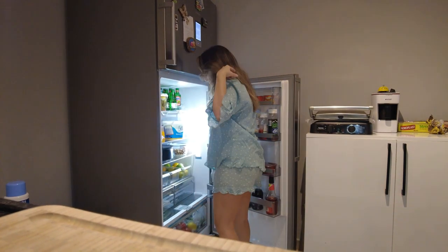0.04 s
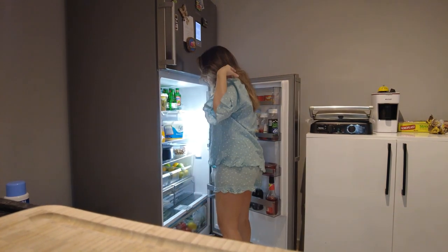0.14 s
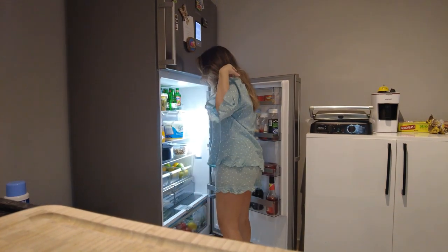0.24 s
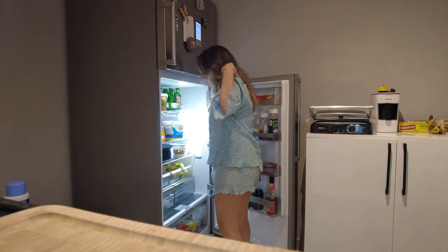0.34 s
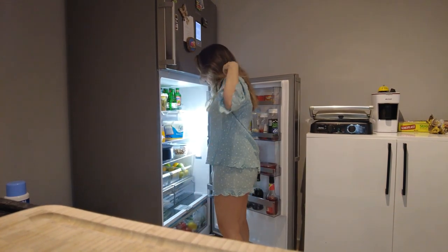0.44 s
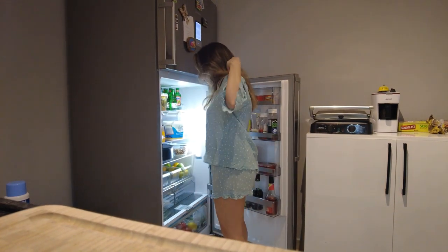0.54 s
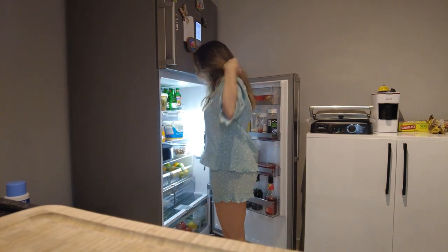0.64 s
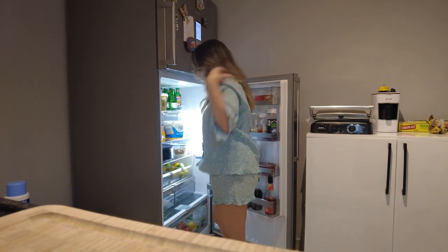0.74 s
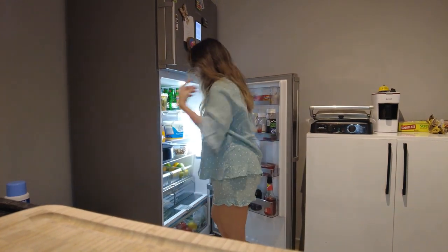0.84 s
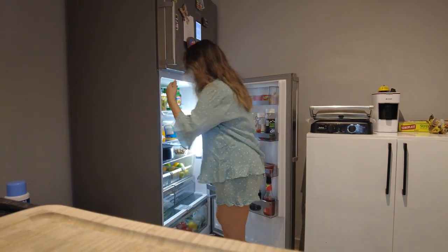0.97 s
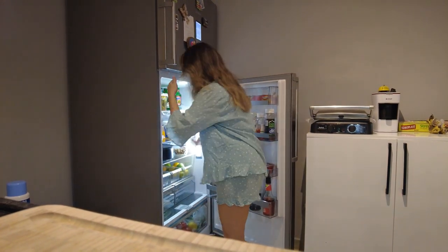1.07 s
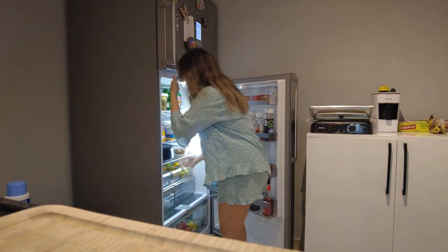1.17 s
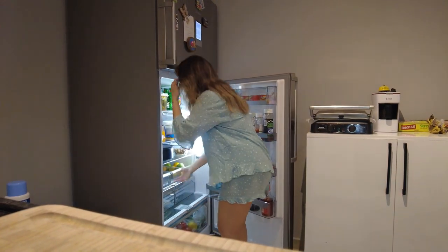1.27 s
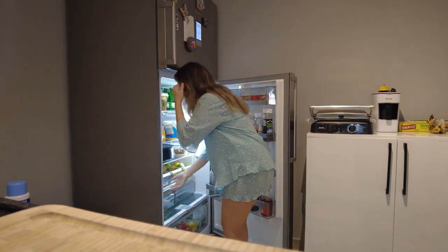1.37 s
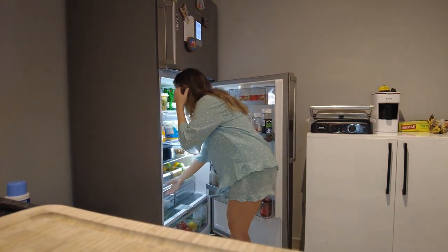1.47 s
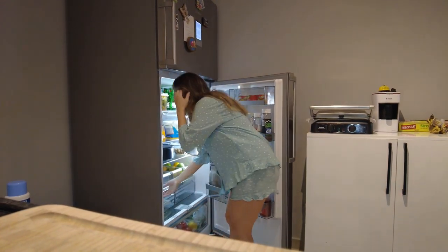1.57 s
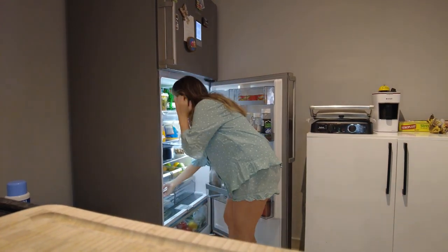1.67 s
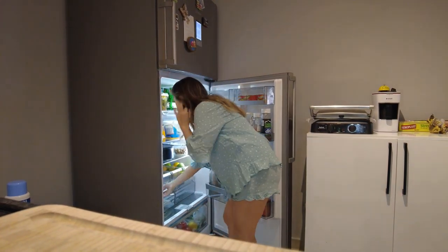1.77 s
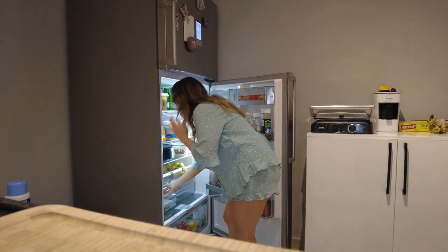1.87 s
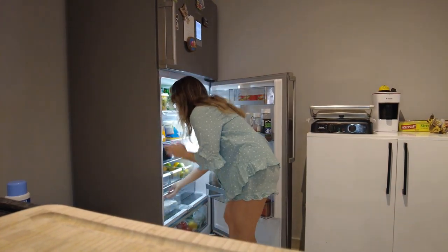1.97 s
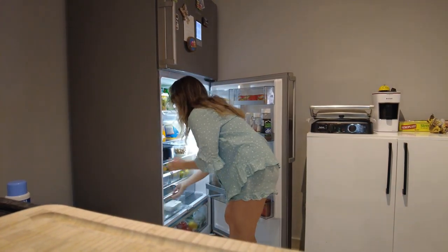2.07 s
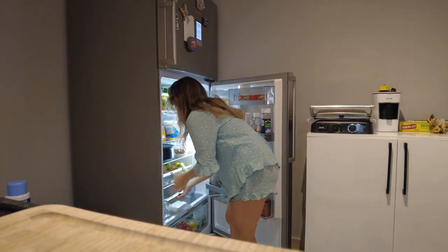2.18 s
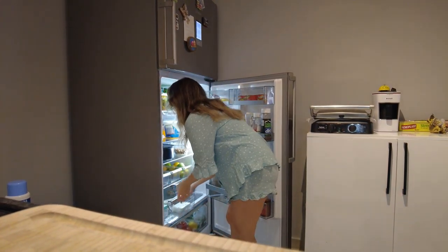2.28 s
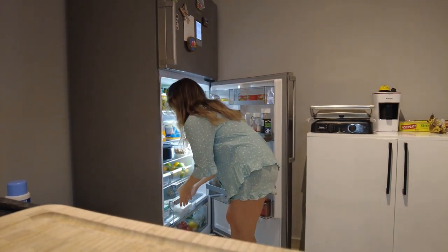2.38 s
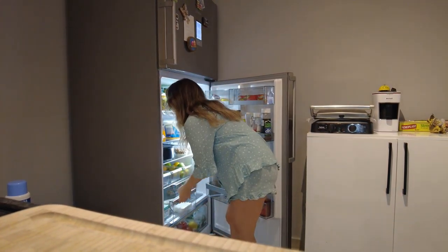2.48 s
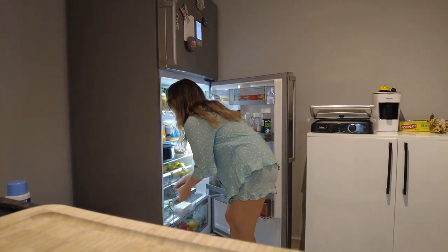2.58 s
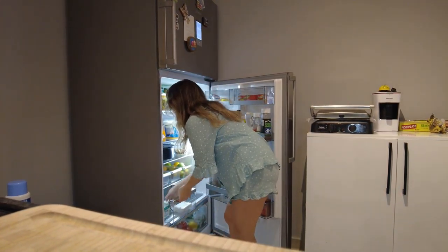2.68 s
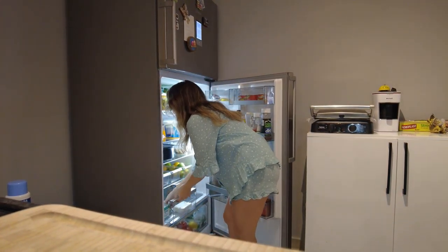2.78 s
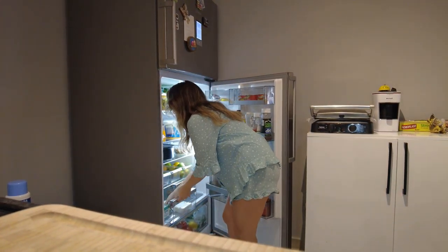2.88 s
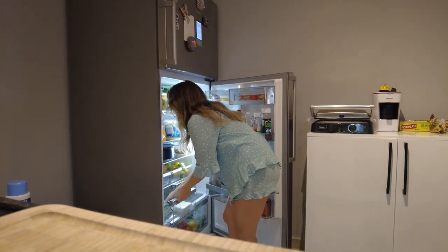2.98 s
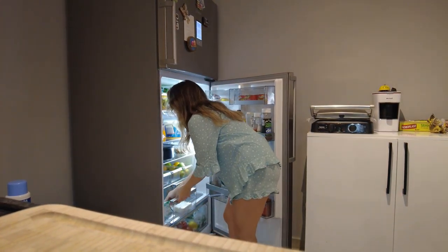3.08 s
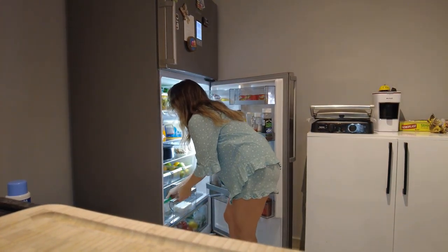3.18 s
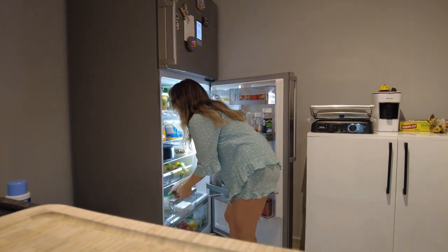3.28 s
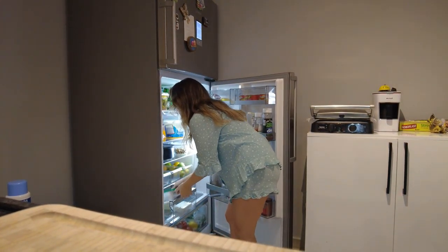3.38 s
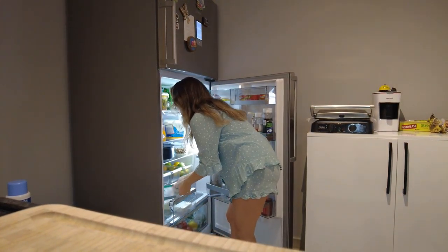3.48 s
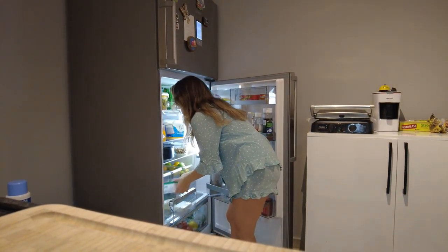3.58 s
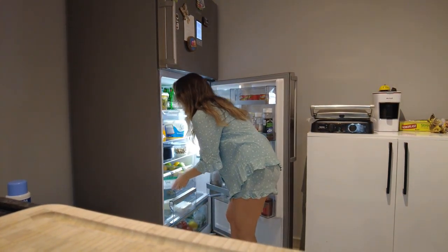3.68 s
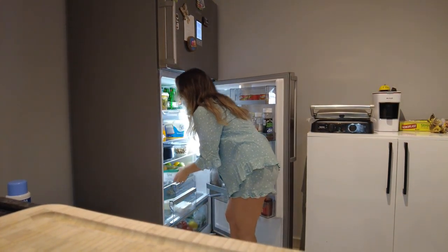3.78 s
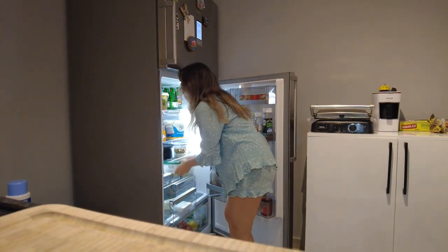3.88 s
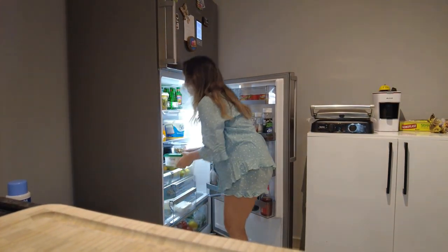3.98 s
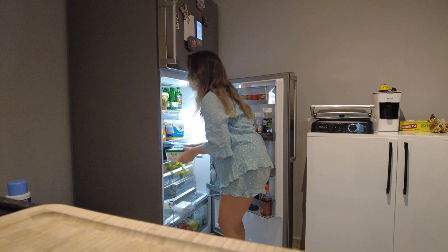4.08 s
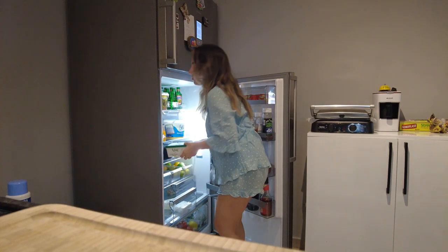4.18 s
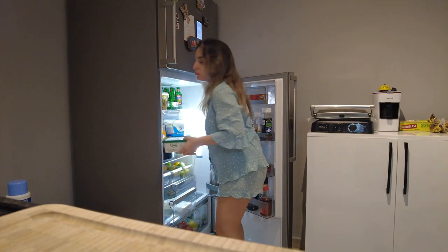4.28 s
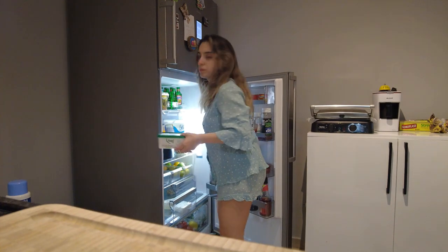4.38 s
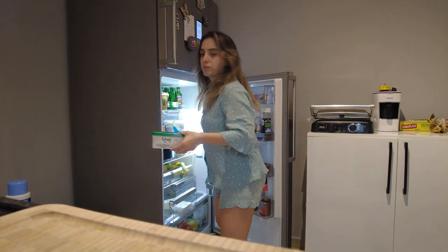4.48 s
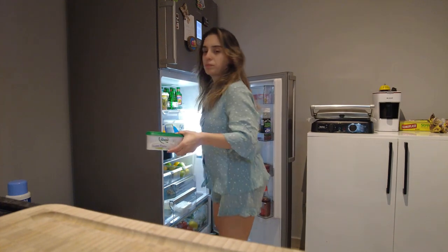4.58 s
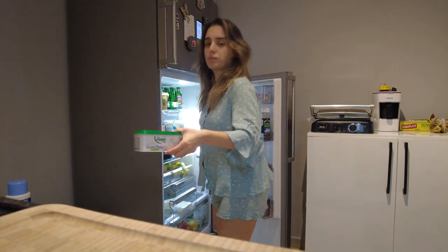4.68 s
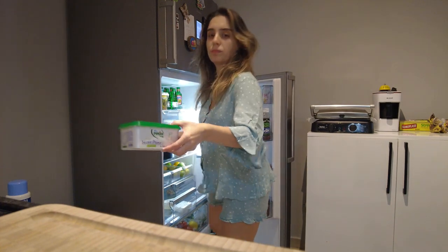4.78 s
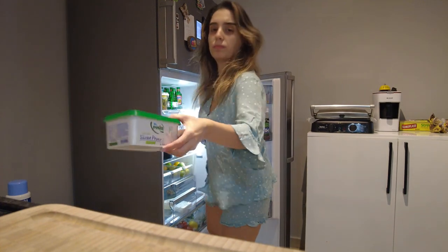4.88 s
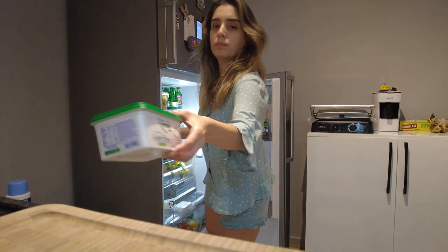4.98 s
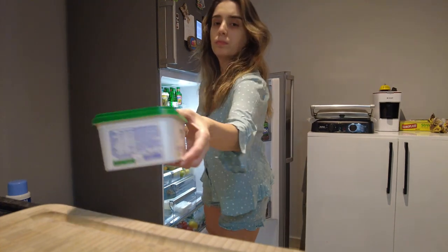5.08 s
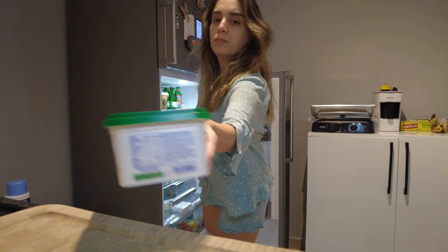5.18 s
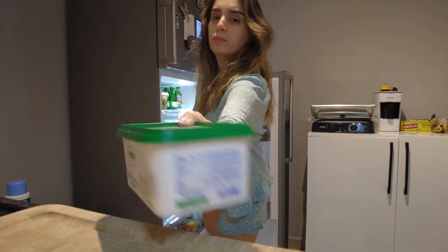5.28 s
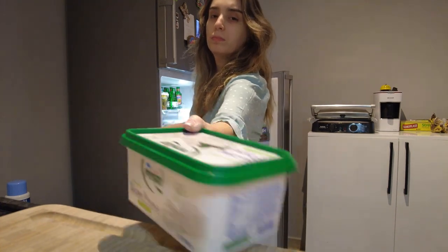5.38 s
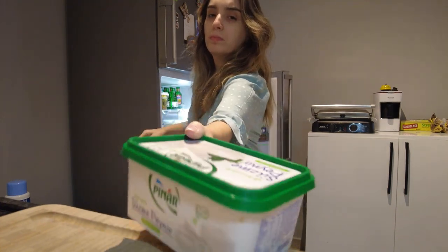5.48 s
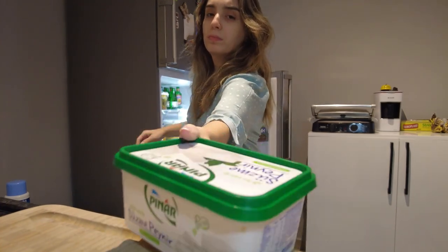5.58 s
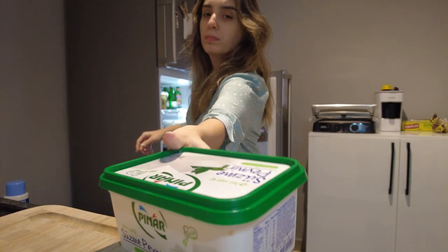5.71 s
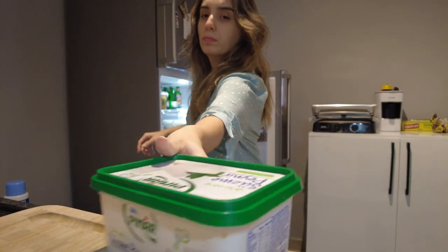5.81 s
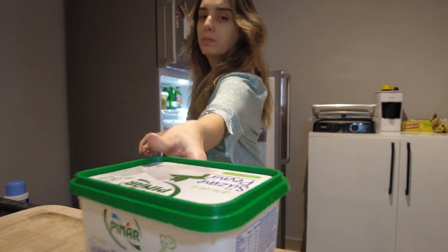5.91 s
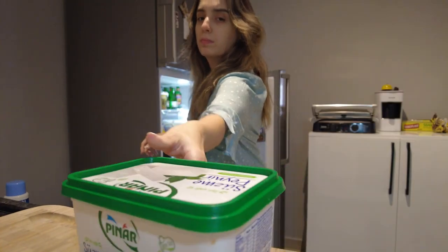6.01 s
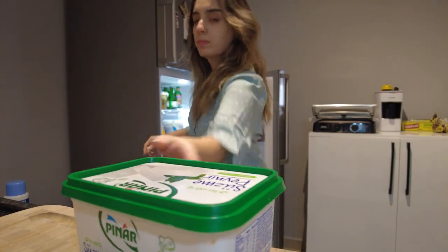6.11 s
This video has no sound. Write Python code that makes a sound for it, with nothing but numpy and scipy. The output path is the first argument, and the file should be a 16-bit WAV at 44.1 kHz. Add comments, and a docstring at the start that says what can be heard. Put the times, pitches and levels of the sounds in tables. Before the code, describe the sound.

Soft fridge rummaging with clunks, drawer rumble, wrapper crackle and slipper scuffs, ending in a hard plastic tub knock and juddering push on wood.

```python
"""A fridge hums across a small hard-walled kitchen while someone shuffles at its open door and shifts jars.
A drawer is pulled, wrappers crackle, the drawer runs home and a plastic tub is dragged off its shelf.
After slipper steps the tub lands on a wooden board right at the microphone: one edge, flat, a juddering push.
Blows ring decaying modes, slides filter random slips, cloth is coloured noise; distance is the share of room echo.
The loudest blow overloads the microphone."""
import sys
import numpy as np
from scipy import signal
from scipy.fft import rfft, irfft, next_fast_len
from scipy.io import wavfile

SR = 44100
rng = np.random.default_rng(int(sys.argv[2]) if len(sys.argv) > 2 else 0)


def transcribe(u):
    """Save the signal u as a 16-bit wav file named by the first command-line argument.

    u: samples, shape (n,) or (channels, n), limited to [-1, 1]; the rate is SR.
    q: integer samples, one column per channel.
    """
    v = np.clip(np.atleast_2d(u).T, -1, 1)
    q = np.round(v * 32767).astype(np.int16)
    wavfile.write(sys.argv[1], SR, q)


N = 271157
TIME = np.arange(N) / SR

# Event levels are at the source, before the distance mix in scene(). In the slides,
# start_s is when full speed is reached, after rise_s; hold_s and fall_s follow.

# kitchen air at the microphone, spectrum: pitch_hz, level_db
AIR_COLOUR = [(20, 9.5), (30, 5.5), (45, 8), (65, -5.5), (80, -14.5), (110, -8.5), (200, -16.5), (350, -26),
              (550, -28), (1100, -36.5), (3000, -42.5), (8000, -47.5), (15500, -54)]
AIR_DB = -41.5
# fridge motor tones: pitch_hz, level_db
HUM = [(27, -50), (78.5, -47.5)]
# puffs of air on the microphone: start_s, rise_s, hold_s, fall_s, level_db
PUFFS = [(0, .05, 0.049, 0.14, -22), (5.804, 0.204, 0.51, 0.14, -38.5)]
# kitchen echo: pitch_hz, t60_s
ROOM = [(100, 0.85), (400, 0.49), (1500, 0.42), (5000, 0.2), (15000, 0.034)]

# things shift on a shelf with a hollow rub: start_s, rise_s, hold_s, fall_s, rumble_db, scrape_db
SHIFTS = [(0, .02, 0.013, 0.049, -40, -54.5), (.2, 0.058, 0.18, 0.05, -49, -58),
          (2.9, 0.15, 0.11, .05, -49, -53), (3.22, 0.026, 0.031, 0.031, -50, -65)]
# hollow resonances of that rub: pitch_hz, width_hz, level_db
HOLLOW = [(234, 103, -6), (505, 80, 0.5), (760, 400, -16.5)]
# spectrum of plastic scraping: pitch_hz, level_db
GRIT_COLOUR = [(400, 7.5), (800, -2.5), (1150, -2.5), (1550, -2), (1900, -13.5), (2700, -5), (3600, -18),
               (6000, -15), (15000, -37.5)]
SCRAPE_POWER = 0.52  # the scrape grows as this power of the sliding speed

# the body moves and the clothes rustle: start_s, hold_s, level_db
MOVES = [(0, 0.25, -55.5), (.89, 0.013, -56.5), (1.08, 0.051, -58), (1.767, 0.65, -49), (2.882, .34, -52),
         (3.88, 0.075, -46.5), (4.07, .1, -56.5), (4.62, 0.47, -56.5), (5.324, 0.11, -56.5)]
MOVE_RISE_S, MOVE_FALL_S, CLOTH_REST_DB = 0.042, 0.067, -58.5
# spectrum of cloth: pitch_hz, level_db
FABRIC_COLOUR = [(300, 4.5), (800, 2), (1600, 1), (3000, 0), (6000, -4), (10000, -10.5), (15500, -16.5)]
# slipper soles slide on the floor: start_s, rise_s, hold_s, fall_s, level_db
SCUFFS = [(0.114, 0.033, 0.05, 0.07, -43), (1.412, 0.02, 0.095, 0.036, -38.5),
          (4.931, 0.07, 0.0089, 0.031, -37)]
# spectrum of a sole: pitch_hz, level_db
SOLE_COLOUR = [(200, -28), (550, -6), (1100, -8), (1500, -4), (2200, -6.5), (3000, -2.5), (4800, -2),
               (7500, -6.5), (11000, -13.5), (15500, -20)]

# jars and tubs bump the shelves: start_s, level_db, contact_hz (softness corner),
# lowest_hz (the spot rings weakly below), tick_db
KNOCKS = [(0.356, -34.5, 790, 590, -72), (1.051, -42.5, 1600, 444, -44), (1.555, -38, 880, 605, -44.5),
          (1.644, -33.5, 435, 228, -65), (1.764, -30.5, 690, 223, -40), (1.835, -43, 1474, 296, -41),
          (2.169, -31.5, 1590, 900, -57), (2.345, -41, 2500, 300, -33.5), (2.845, -29.5, 2200, 116, -35),
          (2.974, -29.5, 1320, 102.5, -39), (3.184, -45.5, 2980, 790, -37), (3.860, -40.5, 2220, 400, -32),
          (4.585, -39.5, 1560, 282, -36.5)]
# fridge shelf modes: pitch_hz, level_db, t60_s
SHELF_MODES = [(110, 5.5, 0.12), (167.4, 1.5, 0.033), (257.5, -3.5, 0.093), (377, -2.5, 0.19),
               (530, -3.5, 0.034), (629, 2, 0.046), (870, -4, 0.055), (908, -2, 0.042), (1252, -7, 0.13),
               (1305, -9, 0.058), (1444, 5, 0.015), (1995, 3, 0.013), (2350, -0.5, 0.032), (2900, -9, .03)]
# spectrum of a contact tick: pitch_hz, level_db
TICK_COLOUR = [(500, 20.5), (1500, -12), (2800, 7.5), (4000, -6.5), (6000, -12), (9000, -17.5),
               (15500, -59)]
TICK_DECAY_S = 0.012
# after the rim the base comes down: delay, level above the rim, share of the contact corner
SETTLE_S, SETTLE_DB, SETTLE_SOFTNESS = 0.012, 6.5, 0.47
# each spot on a shelf rings a little differently: random spread of level and (as a share) of pitch
SPOT_DB, SPOT_DETUNE = 1, 0.027

# the drawer is pulled: start_s, rise_s, hold_s, fall_s, rumble_db, scrape_db
DRAWER = [(2.28, 0.28, 0.013, .14, -31.5, -42.5)]
# drawer runner resonances: pitch_hz, width_hz, level_db
RUNNERS = [(101, 39, -1), (171, 50, -3), (247, 60, -3.5), (340.3, 28, 5), (384, 31, -2.5), (492, 80, -9),
           (588, 46, -11), (1160, 650, -27.5), (1570, 130, -22)]
# drawer contents nudge each other: level at full speed, its spread, contact corner, lowest pitch
JOSTLE_DB, JOSTLE_SPREAD_DB, JOSTLE_CONTACT_HZ, JOSTLE_LOWEST_HZ = -38, 2, 1500, 400
# the drawer jolts dully over its stops: start_s, level_db
JOLTS = [(1.956, -10.5), (2.132, -15.5), (2.415, -20), (2.49, -23)]
JOLT_CONTACT_HZ = 73
# crisp wrappers: start_s, level_db, decay_s
CRACKLES = [(2.978, -41, 0.03), (3.087, -47, 0.025), (3.214, -41, 0.033), (3.402, -64, 0.02),
            (3.859, -46.5, 0.075), (4.168, -49, 0.042)]
# spectrum of a wrapper: pitch_hz, level_db
WRAPPER_COLOUR = [(1000, 1.5), (3000, 6.5), (6000, 5.5), (10000, 1.5), (14000, -1.5)]
# the drawer runs home and rocks: start_s, level_db, contact_hz, lowest_hz, tick_db
SHUT = [(3.554, -26, 794, 220, -39), (3.565, -18, 475, 167, -38), (3.575, -34, 400, 100, -63),
        (3.605, -35.5, 1100, 600, -46)]
# modes of the drawer's plastic box: pitch_hz, level_db, t60_s
BOX_MODES = [(109, 4, 0.1), (161, -14, 0.24), (254.6, 1.5, 0.16), (360, 4, 0.079), (480, 10, 0.052),
             (647, 2, 0.086), (879, 6.5, 0.075), (1320, -11, 0.093), (1527, 4, 0.019), (2500, -21, 0.062)]
# the tub is dragged off its shelf: start_s, rise_s, hold_s, fall_s, rumble_db, scrape_db
DRAG = [(3.86, .08, 0.2, 0.071, -41.5, -53.5)]
# drone resonances of that shelf: pitch_hz, width_hz, level_db
DRONE = [(177.4, 38, -4.5), (358, 41, -15), (491, 97, -21), (636, 27, -13.5)]

# the tub meets the board: start_s, tub_db, board_db, contact_hz, click_db
LANDINGS = [(5.5665, -9, -30, 2100, -19), (5.6065, -11, -15, 560, -40), (5.7482, -8, 0, 1900, 3),
            (5.7722, -15, -13, 1900, -22), (5.870, -12, -19, 2300, -22)]
# modes of the full tub: pitch_hz, level_db, t60_s
TUB_MODES = [(174, -13, 0.073), (252, -9.5, 0.18), (363.6, 0, 0.069), (481, -14.5, 0.41), (627, -13, 0.12),
             (758, -10, 0.097), (957, -2.5, 0.035), (1280, 0, 0.018), (1734, -0.5, 0.017),
             (2260, -1.5, 0.005), (3200, -20, 0.016)]
# modes of the wooden board: pitch_hz, level_db, t60_s
BOARD_MODES = [(237, -48, 0.23), (389.4, -9, 0.14), (496, 2.5, 0.055), (575.3, 4.5, 0.082),
               (772, 5.5, 0.029), (872, 4.5, 0.033), (1048, -6, 0.049), (1298.4, -10, 0.13),
               (1410, 5.5, 0.019), (1556, 0.5, 0.024), (1790, -15, 0.053), (2168, -13, 0.088),
               (2280, 0.5, 0.015), (2660, -6, 0.036), (3440, -11, 0.024), (4600, -32, .015)]
# spectrum of the rim's click: pitch_hz, level_db
CLICK_COLOUR = [(700, -6), (1500, 0), (2800, -2), (3800, -5), (5200, -2), (7000, -5), (9000, -13),
                (12000, -23), (15500, -32)]
EAR_LAG_MS = 0.052  # right channel after left
# first echoes off the counter and the things on it: left_ms, right_ms, level_db
NEARBY = [(3.05, 2.15, -12), (5.65, 4.8, -15)]
# the tub's foot scrapes on the board: start_s, rise_s, hold_s, fall_s, level_db
PUSHES = [(5.578, 0.0037, 0.0055, 0.066, -36.5), (5.78, 0.049, 0.17, 0.07, -29)]
# spectrum of that scrape: pitch_hz, level_db
RUB_COLOUR = [(100, -8), (260, -9), (580, -10), (750, -13), (1100, -21.5), (1450, -14), (2000, -27.5),
              (2800, -24.5), (3800, -36.5), (6500, -41.5), (10000, -46.5), (15500, -55)]
# the foot judders until it catches: catch_s, level_db
JUDDERS = [(5.865, -15), (5.95, -27.5)]
JUDDER_HZ = 582  # centre of a wandering pitch
JUDDER_SWELL_S, JUDDER_STOP_S = 0.032, 0.014
TOP_HZ = 15600  # upper limit of the microphone channel


def undb(db):
    """Decibels to gain."""
    return 10 ** (np.asarray(db) / 20)


def unit(x):
    """Scale to rms 1."""
    return x / np.sqrt(np.mean(x ** 2))


def filtered(x, response):
    """Pass x through a frequency response given as a function of Hz."""
    size = next_fast_len(x.shape[-1] + 4096)
    hz = np.maximum(np.fft.rfftfreq(size, 1 / SR), 1)
    return irfft(rfft(x, size) * response(hz), size)[..., :x.shape[-1]]


def delayed(x, ms):
    """The same sound a little later, by a phase slope."""
    return filtered(x, lambda hz: np.exp(-2j * np.pi * hz * ms / 1000))


def colour(x, points):
    """Shape x by a spectrum, falling away below its first point; rms 1."""
    f, db = np.transpose(points)

    def response(hz):
        return undb(np.interp(np.log(hz), np.log(f), db)) * np.minimum(hz / f[0], 1) ** 2

    return unit(filtered(x, response))


def ear_noise(size, alike_hz=420, treble_likeness=0.085):
    """Diffuse noise at two ports: alike in the bass, nearly unrelated in the treble."""
    def likeness(hz):
        bass_part = (.97 - treble_likeness) / (1 + (hz / alike_hz) ** 2)
        return np.clip(treble_likeness + bass_part, 0, 1)

    mid, side = rng.standard_normal((2, size))
    mid = filtered(mid, lambda hz: np.sqrt(1 + likeness(hz)))
    side = filtered(side, lambda hz: np.sqrt(1 - likeness(hz)))
    return (mid + np.array([side, -side])) / np.sqrt(2)


def grains(rate, spread_db):
    """Tiny slips at random moments (rate per second), of uneven size."""
    size = undb(spread_db * np.minimum(rng.exponential(size=N), 4))
    happens = rng.random(N) < rate / SR
    return unit(happens * size * rng.standard_normal(N))


def waver(rate, depth_db):
    """A gain that wanders at random between knots, rate per second."""
    knots = rng.standard_normal(1024)
    return undb(depth_db * np.interp(TIME * rate, np.arange(len(knots)), knots))


def stroke(s, rise_s, hold_s, fall_s):
    """Speed of one movement, 0 to 1: it gathers, holds from time s, and dies away."""
    before = np.minimum(TIME - s, 0)
    after = np.maximum(TIME - s - hold_s, 0)
    return np.exp(-(before / rise_s) ** 2 - (after / fall_s) ** 2)


def strokes(movements):
    """Combined gain of several movements, each a timing and a level."""
    return sum(undb(db) * stroke(*timing) for *timing, db in movements)


def add(track, s, x):
    """Mix x in from time s."""
    start = max(int(s * SR), 0)
    x = x[..., :N - start]
    track[..., start:start + x.shape[-1]] += x


def struck(modes, contact_hz, lowest_hz=1):
    """Ring of a blow: soft contact misses the high modes, a stiff spot the low ones."""
    hz, db, t60 = np.transpose(modes)[:, :, None]
    t = TIME[:SR // 2]
    stiffness = 1 / np.sqrt(1 + (lowest_hz / hz) ** 4)
    softness = 1 / (1 + (hz / contact_hz) ** 2)
    gain = undb(db) * stiffness * softness
    sign = (-1) ** np.arange(len(hz))[:, None]
    decay = np.exp(-np.log(1000) * t / t60)
    ring = np.sum(sign * gain * np.sin(2 * np.pi * hz * t) * decay, axis=0)
    return ring * (1 - np.exp(-2 * np.pi * contact_hz * t))  # a soft contact starts slower


def spot(modes):
    """The modes as they sound from one place of contact, randomly detuned and rebalanced."""
    chance = rng.standard_normal((len(modes), 2))
    return [(hz * (1 + SPOT_DETUNE * a), db + SPOT_DB * b, t60)
            for (hz, db, t60), (a, b) in zip(modes, chance)]


def burst(points, decay_s):
    """A coloured crack of noise that dies exponentially."""
    t = TIME[:SR // 4]
    return colour(rng.standard_normal(len(t)), points) * np.exp(-t / decay_s)


def lingering(gain, t60_s=0.4):
    """Level of the diffuse echo that a hiss leaves in the room: its energy, leaking away."""
    keep = np.exp(-2 * np.log(1000) / (t60_s * SR))
    return np.sqrt(signal.lfilter([1 - keep], [1, -keep], gain ** 2))


def rustle(gain, points, direct_db, room_db):
    """Fine slips heard directly, and the wide wash that the room makes of them."""
    direct = colour(grains(rate=3000, spread_db=-1.0), points) * gain
    wash = colour(ear_noise(N), points) * lingering(gain)
    return undb(direct_db) * direct + undb(room_db) * wash


def room(x, gap_s=0.0036):
    """Diffuse echo of the kitchen: noise building up over gap_s, dying faster in the treble."""
    t = TIME[:int(SR * .8)]
    noise = ear_noise(len(t))
    f, t60 = np.transpose(ROOM)
    response = 0
    for share, decay in zip(np.eye(len(f)), t60):
        fade = np.exp(-np.log(1000) * t / decay) * (1 - np.exp(-(t / gap_s) ** 2))
        band = filtered(noise, lambda hz: np.interp(np.log(hz), np.log(f), share))
        response = response + band * fade / np.linalg.norm(fade)
    return signal.fftconvolve(x[None], response, axes=1)[:, :N]


def kitchen_air():
    """Room rumble: diffuse coloured noise that wavers slightly."""
    return colour(ear_noise(N), AIR_COLOUR) * undb(AIR_DB) * waver(rate=4.0, depth_db=0.5)


def fridge_hum():
    """The fridge motor: low sine tones, each swaying in level on its own."""
    hum = 0
    for hz, db in HUM:
        tone = np.sqrt(2) * np.sin(2 * np.pi * hz * TIME)
        hum = hum + undb(db) * tone * waver(rate=7, depth_db=2.5)
    return hum


def air_puffs(draught_hz=28):
    """Slow puffs of air on the microphone: swells of very low noise."""
    noise = rng.standard_normal(N)
    draught = unit(filtered(noise, lambda hz: hz / (1 + (hz / draught_hz) ** 4)))
    return draught * strokes(PUFFS)


def slide(pulls, resonances):
    """Stick and slip of plastic on plastic shakes panels and scrapes; both follow the speed."""
    slips, rumble = grains(rate=300, spread_db=-1.0), 0
    for f, width, db in resonances:
        panel = filtered(slips, lambda hz: (1 + 1j * (hz / f - f / hz) * f / width) ** -2)
        rumble = rumble + undb(db) * panel * waver(rate=14, depth_db=3)  # its own fits and starts
    rumble = unit(rumble)
    scrape = colour(grains(rate=900, spread_db=0.0), GRIT_COLOUR) * waver(rate=15, depth_db=0.5)
    out = 0
    for *timing, rumble_db, scrape_db in pulls:
        speed = stroke(*timing)
        out = out + undb(rumble_db) * rumble * speed
        out = out + undb(scrape_db) * scrape * speed ** SCRAPE_POWER
    return out


def clothes():
    """Cloth creases with every move, over a faint steady rustle."""
    moves = [(s, MOVE_RISE_S, hold_s, MOVE_FALL_S, db) for s, hold_s, db in MOVES]
    creasing = (undb(CLOTH_REST_DB) + strokes(moves)) * waver(rate=35, depth_db=1.9)
    return rustle(creasing, FABRIC_COLOUR, direct_db=-8.5, room_db=-5.5)


def slippers():
    """Each sole speeds up, slides in fine slips and stops."""
    out = 0
    for *timing, db in SCUFFS:
        out = out + rustle(undb(db) * stroke(*timing), SOLE_COLOUR, direct_db=-6.0, room_db=1)
    return out


def shelf_knocks():
    """Jars and tubs touch rim first with a tick, then settle on a softer base; the shelf rings."""
    out = np.zeros(N)
    for s, db, contact_hz, lowest_hz, tick_db in KNOCKS:
        modes = spot(SHELF_MODES)
        rim = struck(modes, contact_hz, lowest_hz)
        base = struck(modes, SETTLE_SOFTNESS * contact_hz, lowest_hz)
        add(out, s, undb(db) * rim)
        add(out, s, undb(tick_db) * burst(TICK_COLOUR, TICK_DECAY_S))
        add(out, s + SETTLE_S, undb(db + SETTLE_DB) * base)
    return out


def drawer_jostle(count=16):
    """Things in the drawer nudge each other at random, harder the faster it runs."""
    s, rise_s, hold_s, fall_s = DRAWER[0][:4]
    speed, out = stroke(s, rise_s, hold_s, fall_s), np.zeros(N)
    for _ in range(count):
        at = rng.uniform(s - 1.5 * rise_s, s + hold_s + fall_s)
        strength = undb(JOSTLE_DB + JOSTLE_SPREAD_DB * rng.standard_normal())
        strength = strength * speed[int(at * SR)] ** SCRAPE_POWER
        add(out, at, strength * struck(spot(SHELF_MODES), JOSTLE_CONTACT_HZ, JOSTLE_LOWEST_HZ))
    return out


def drawer_jolts():
    """The drawer jolts over its stops: very soft blows that leave mostly the low modes."""
    out = np.zeros(N)
    for s, db in JOLTS:
        add(out, s, undb(db) * struck(SHELF_MODES, JOLT_CONTACT_HZ))
    return out


def wrappers():
    """Crisp wrappers crackle in short bursts of bright noise."""
    out = np.zeros(N)
    for s, db, decay_s in CRACKLES:
        add(out, s, undb(db) * burst(WRAPPER_COLOUR, decay_s))
    return out


def drawer_shut():
    """The drawer runs home and rocks: quick blows ring its plastic box, each with a tick."""
    out = np.zeros(N)
    for s, db, contact_hz, lowest_hz, tick_db in SHUT:
        add(out, s, undb(db) * struck(BOX_MODES, contact_hz, lowest_hz))
        add(out, s, undb(tick_db) * burst(TICK_COLOUR, TICK_DECAY_S))
    return out


def tub_landings():
    """Each touch clicks at the rim, rings tub and board, and reaches the left a little sooner."""
    out = np.zeros((2, N))
    click = colour(signal.unit_impulse(512, 24), CLICK_COLOUR)
    click = click / click.max()
    for s, tub_db, board_db, contact_hz, click_db in LANDINGS:
        tub = undb(tub_db) * struck(TUB_MODES, contact_hz)
        board = undb(board_db) * struck(BOARD_MODES, contact_hz)
        blow = tub + board
        add(blow, 0, -undb(click_db) * click)
        add(out, s, np.array([blow, delayed(blow, EAR_LAG_MS)]))
    return out


def tub_push(overtone_db=-22):
    """The tub's foot slides with a grainy rub and judders, swelling until it catches."""
    phase = 2 * np.pi * np.cumsum(JUDDER_HZ * waver(rate=110, depth_db=0.58)) / SR
    judder = unit(np.sin(phase) + undb(overtone_db) * np.sin(2 * phase))
    judder = judder * waver(rate=120, depth_db=-1.0)
    swell = 0
    for s, db in JUDDERS:
        rise_or_stop = np.minimum((TIME - s) / JUDDER_SWELL_S, (s - TIME) / JUDDER_STOP_S)
        swell = swell + undb(db) * np.exp(rise_or_stop)
    rub = colour(grains(rate=1800, spread_db=-1.5), RUB_COLOUR)
    return judder * swell + rub * strokes(PUSHES)


def counter_echoes(board):
    """Quick single reflections of the board's sound, delayed separately left and right."""
    out = 0
    for left_ms, right_ms, db in NEARBY:
        out = out + undb(db) * np.array([delayed(board[0], left_ms), delayed(board[1], right_ms)])
    return out


def scene(fridge_direct_db=-5.0, fridge_room_db=-1.5, board_room_db=-10, left_db=.5):
    """The fridge is far and mostly heard through the room; the board is close to the microphone."""
    fridge = slide(SHIFTS, HOLLOW) + shelf_knocks()
    fridge = fridge + slide(DRAWER, RUNNERS) + drawer_jostle() + drawer_jolts()
    fridge = fridge + wrappers() + drawer_shut() + slide(DRAG, DRONE)
    board = tub_landings() + tub_push()
    direct = undb(fridge_direct_db) * fridge + board + counter_echoes(board)
    echo = room(undb(fridge_room_db) * fridge + undb(board_room_db) * board[0])
    person = clothes() + slippers()
    background = kitchen_air() + fridge_hum() + air_puffs()
    balance = undb([[left_db], [-left_db]])
    return (direct + echo + person + background) * balance


def record(dry):
    """The microphone flattens the loudest blow against full scale; the extreme treble is cut."""
    flattened = dry / (1 + dry ** 16) ** (1 / 16)
    low_pass = signal.ellip(10, .1, 70, TOP_HZ, fs=SR, output="sos")
    return signal.sosfilt(low_pass, flattened)


dry = scene()
out = record(dry)
transcribe(out)
```